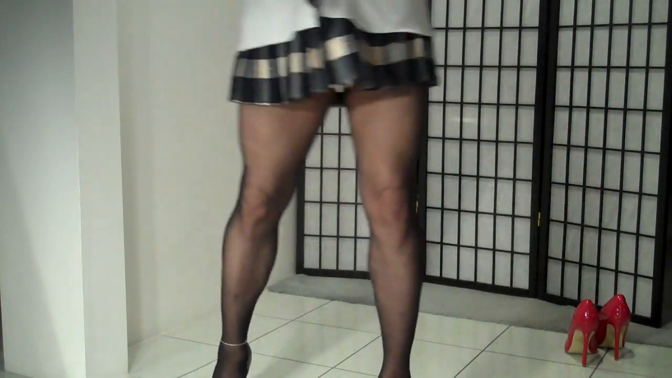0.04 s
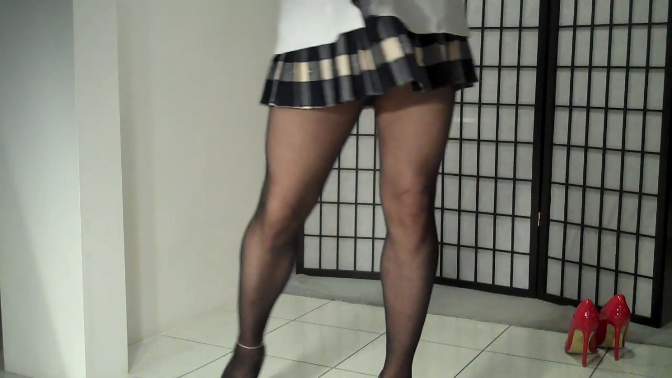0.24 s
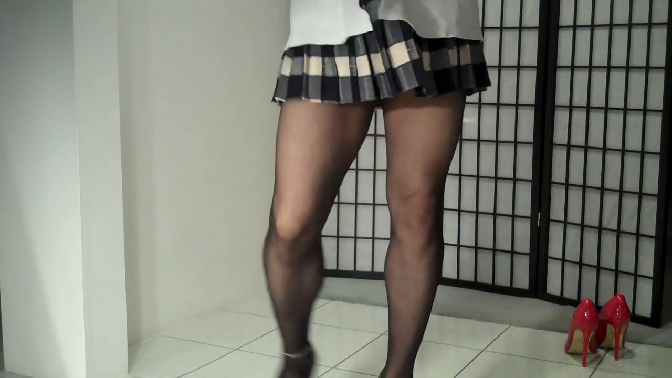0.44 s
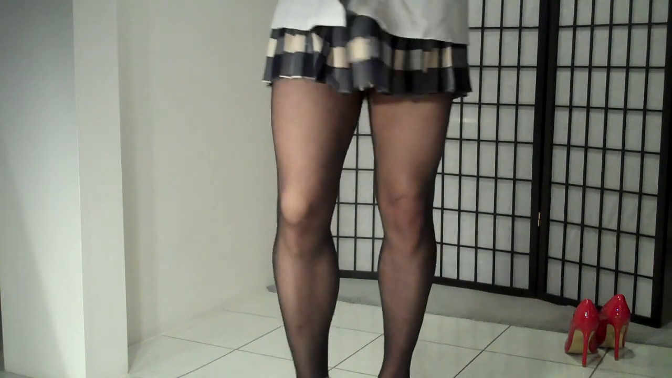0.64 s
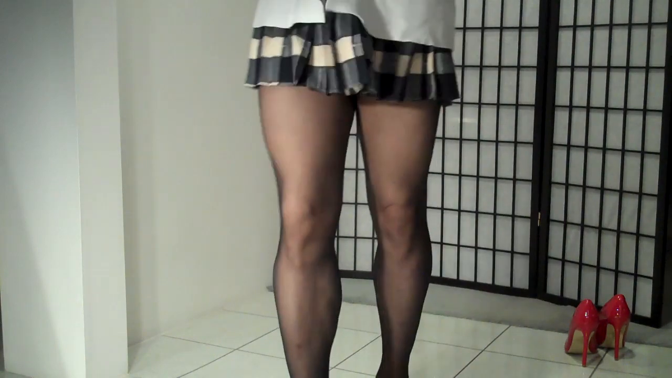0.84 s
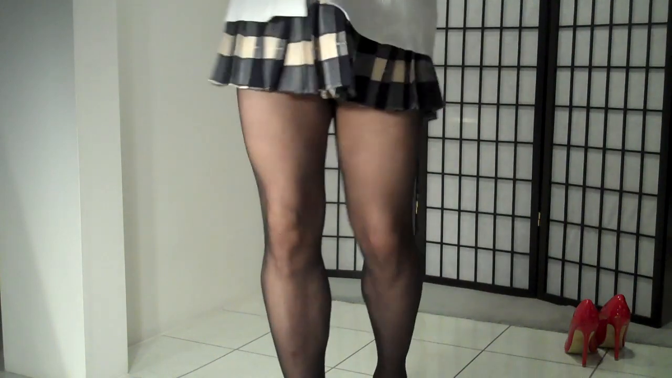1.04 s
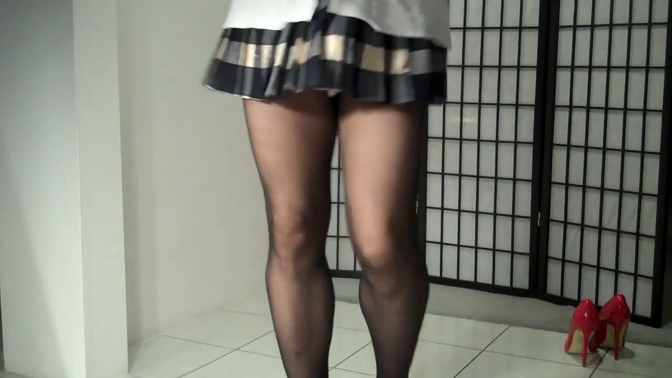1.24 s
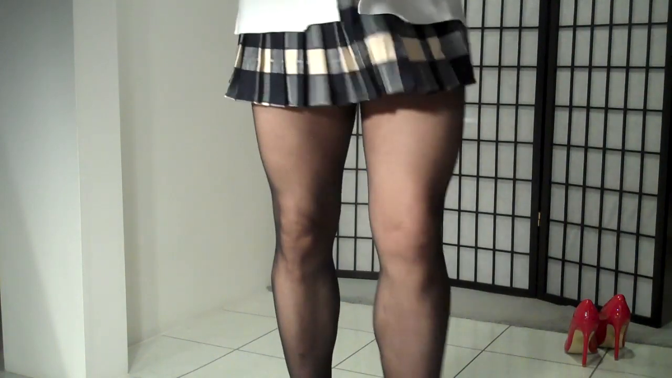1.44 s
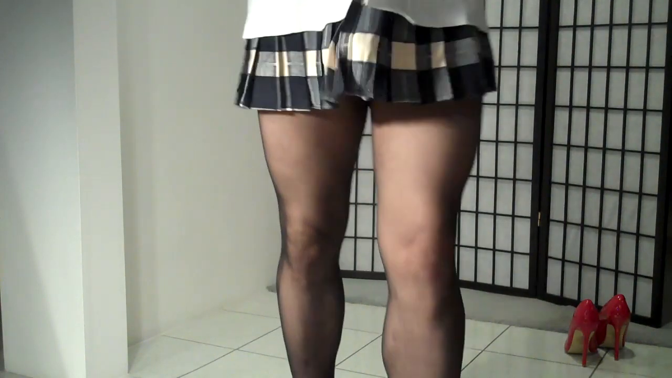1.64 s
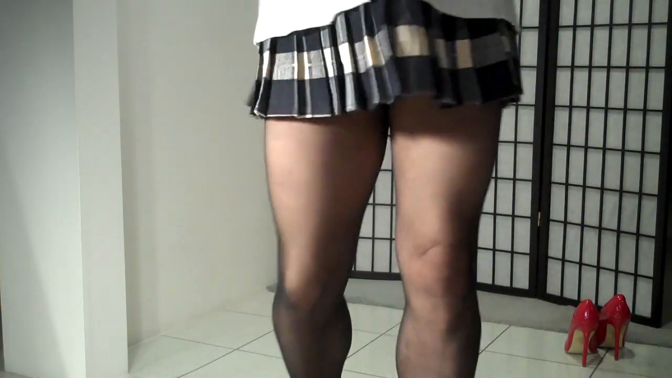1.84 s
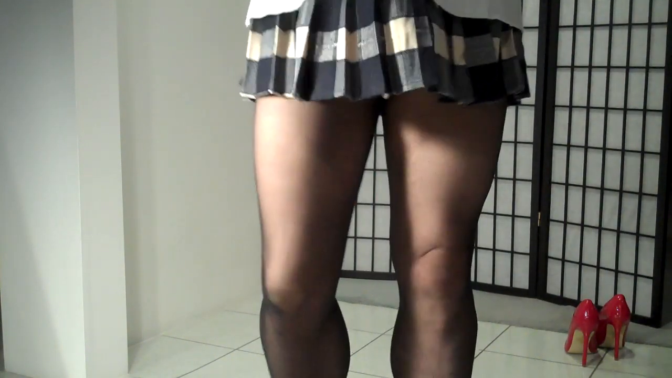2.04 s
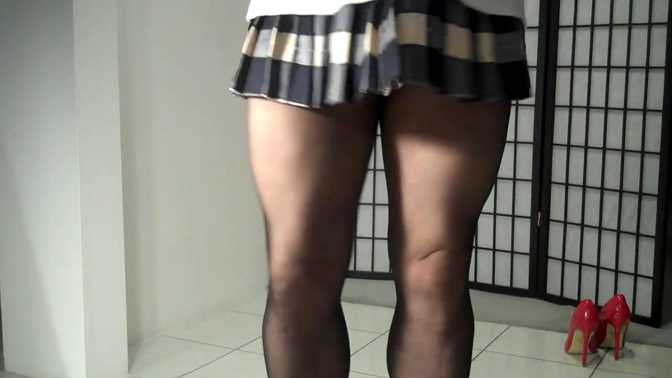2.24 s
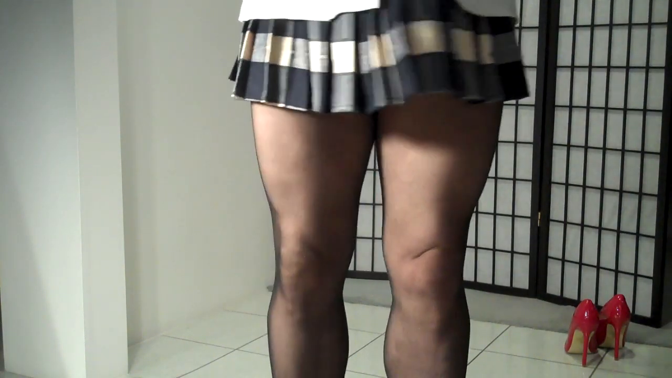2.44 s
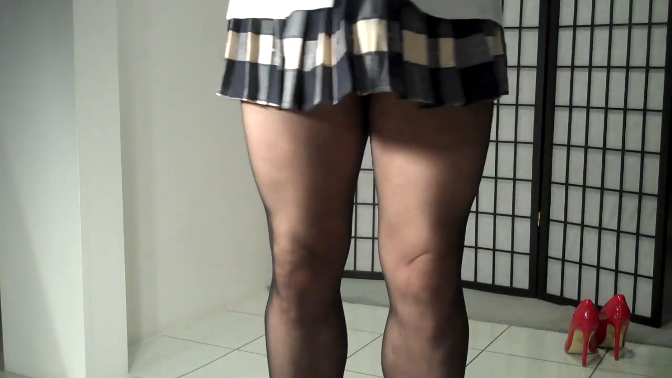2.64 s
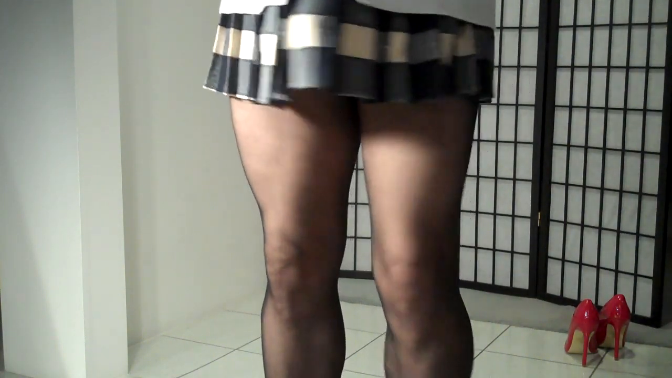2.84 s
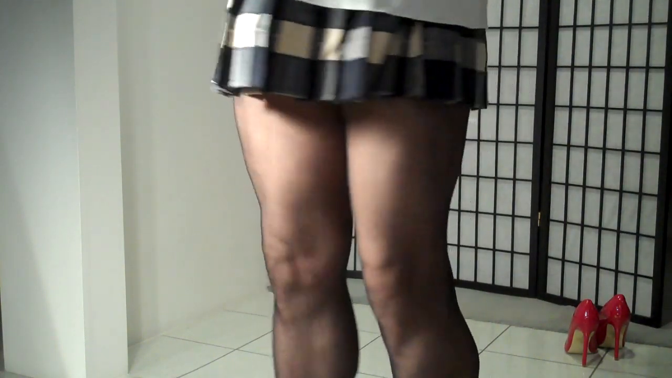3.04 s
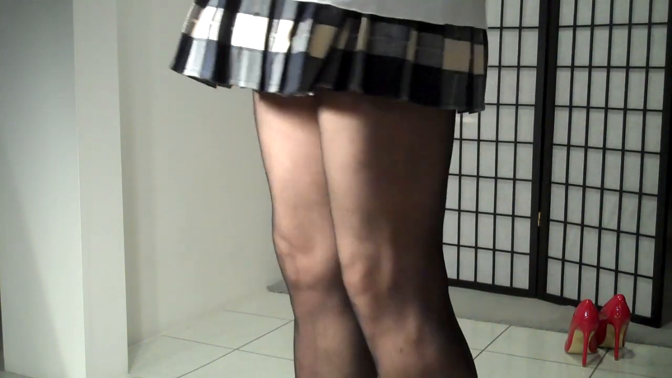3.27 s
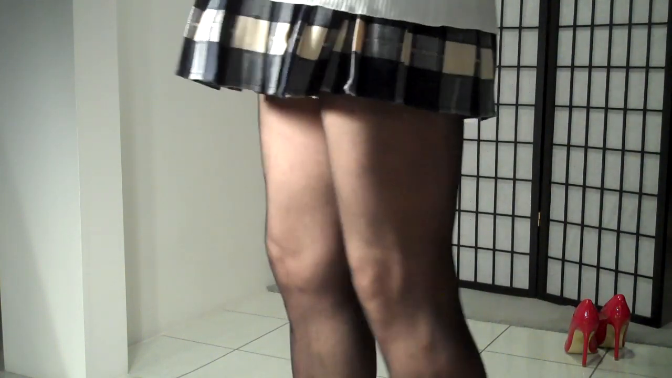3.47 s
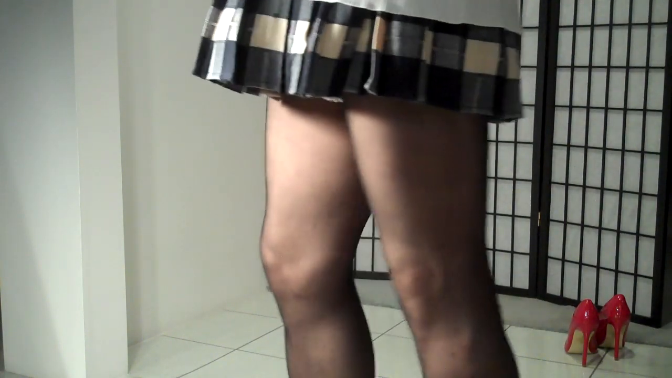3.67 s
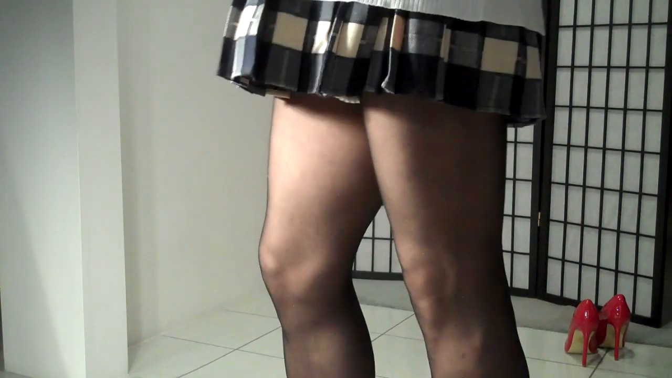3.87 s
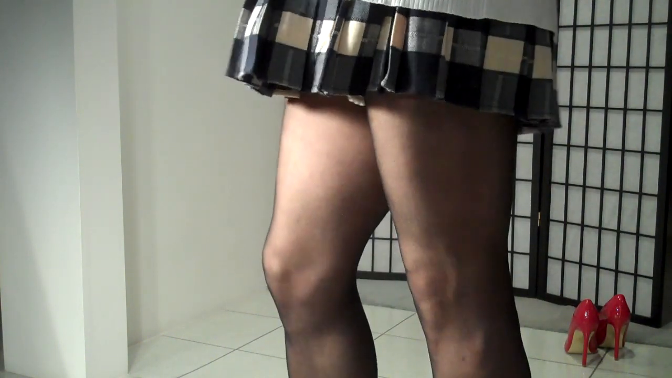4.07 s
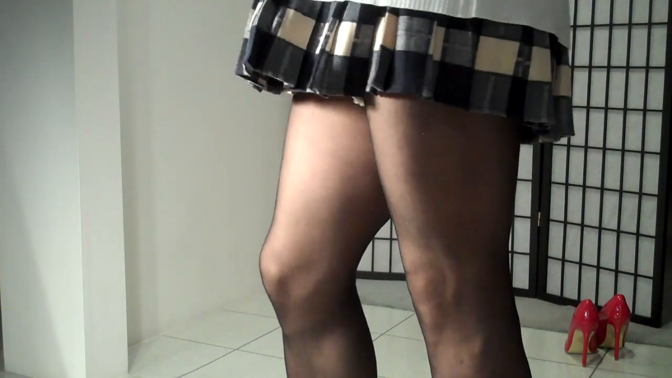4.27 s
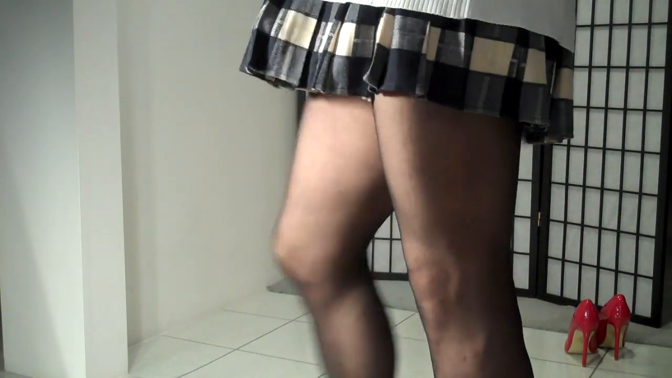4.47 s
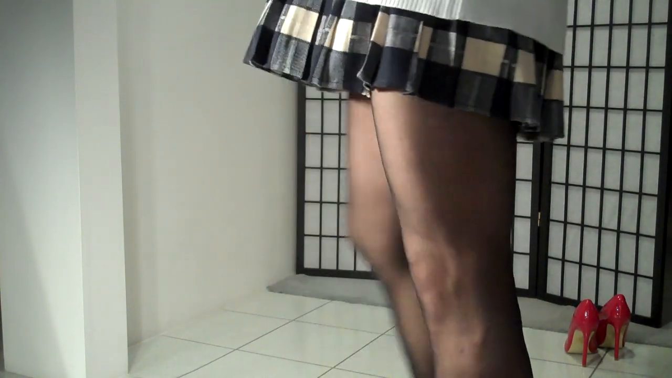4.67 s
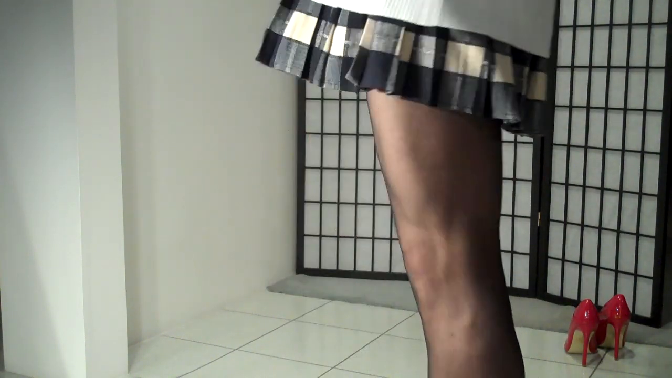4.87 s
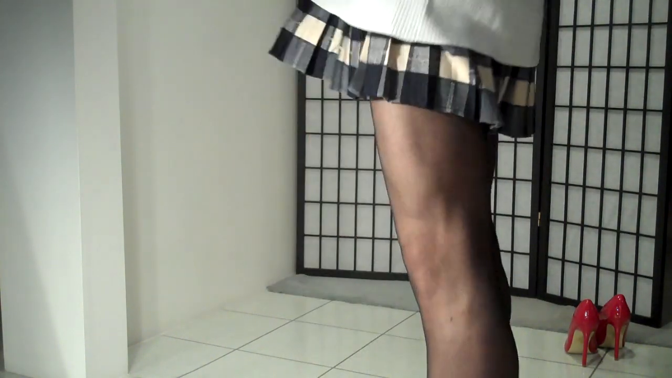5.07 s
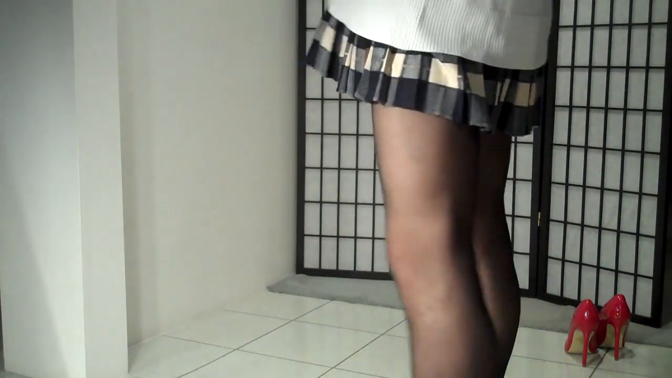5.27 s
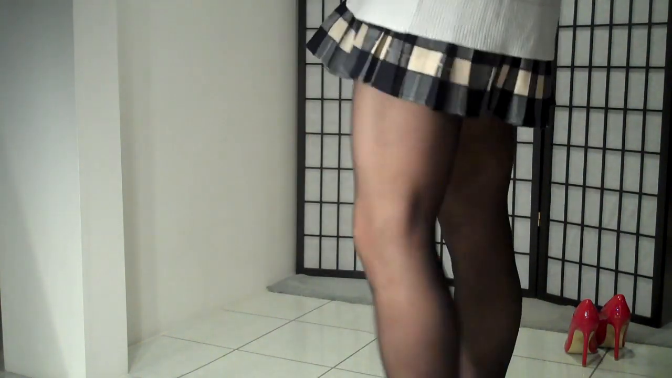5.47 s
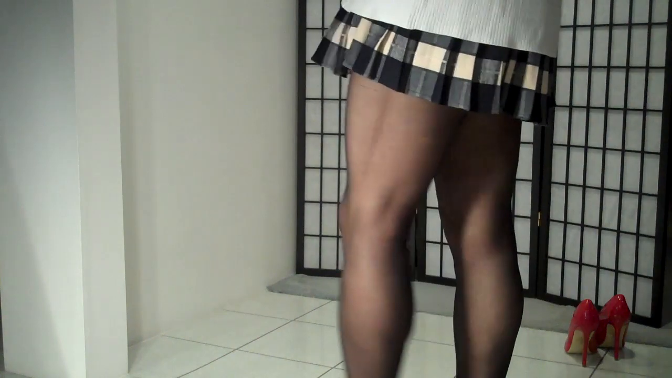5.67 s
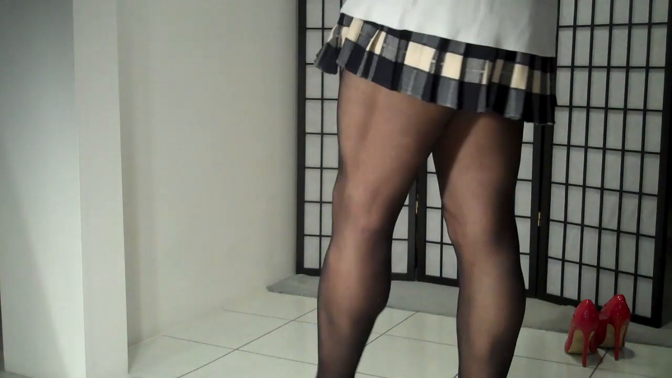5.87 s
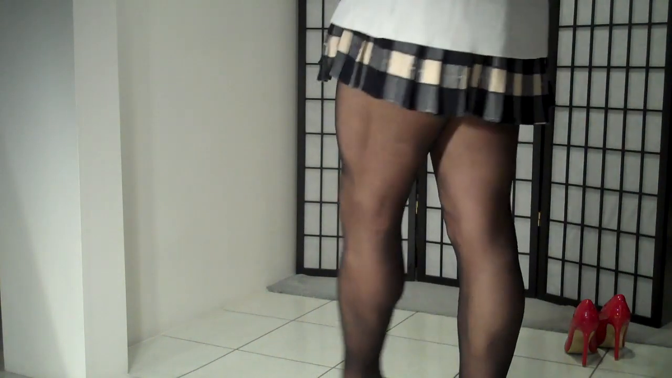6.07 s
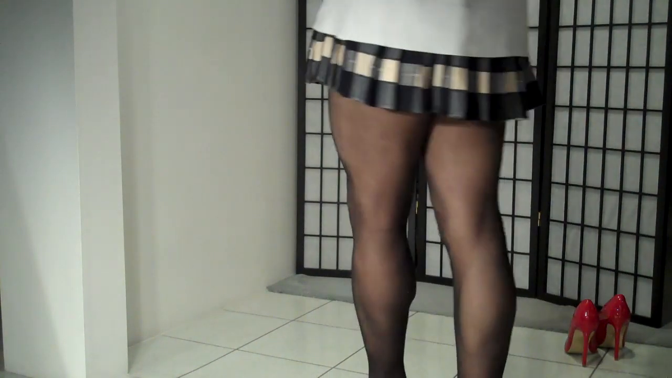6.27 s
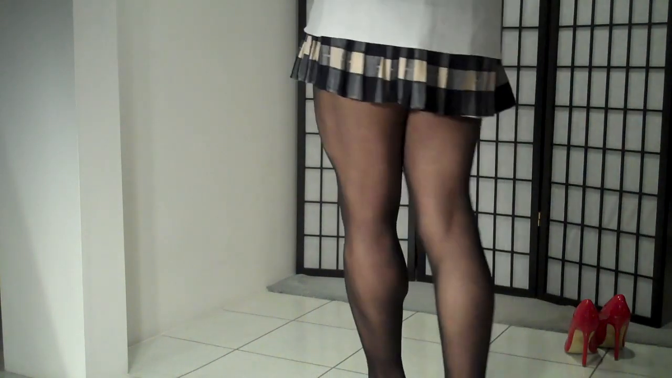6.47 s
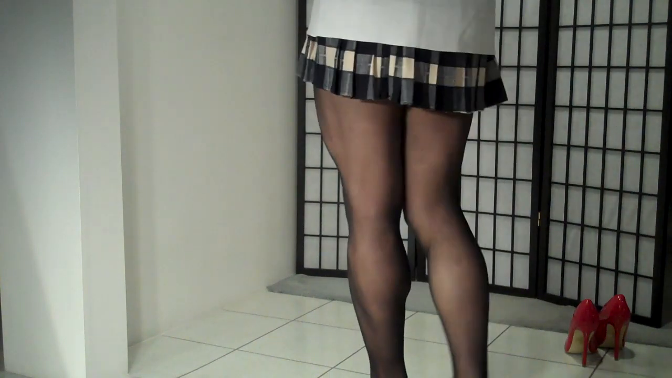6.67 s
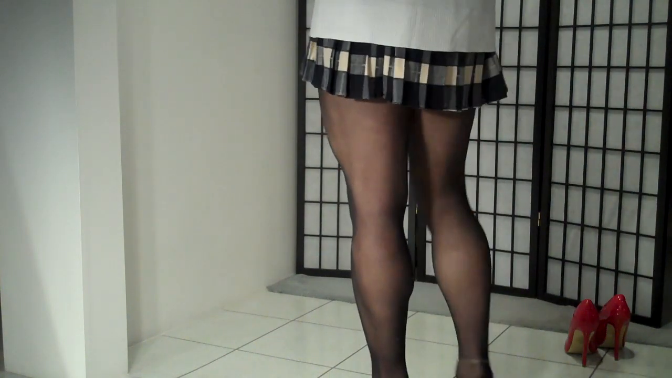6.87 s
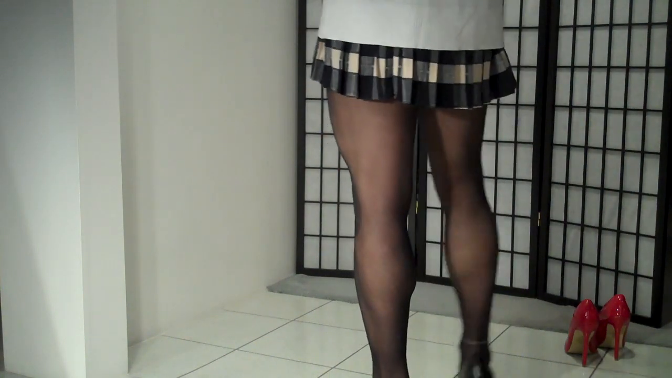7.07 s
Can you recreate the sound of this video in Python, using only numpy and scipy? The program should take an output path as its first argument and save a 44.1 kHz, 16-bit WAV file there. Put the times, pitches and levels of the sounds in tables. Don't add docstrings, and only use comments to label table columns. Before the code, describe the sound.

Steady, slightly bright microphone hiss and a very faint low drone fill a small, bare, reflective tiled room. Soft cloth rustles at 0.1 and 0.5 s. At 0.7 s a high-heeled shoe lands with a hollow knock, low thud and small tick; a sharp snap and scuff follow at 0.87 s, then crisp rubbing and a lighter contact at 1.0 s. Another step knocks at 1.5 s, another at 2.0 s, with very sharp snaps and a thin drag near 2.1 s. A hollow step at 2.3 s leads into fabric rubs until about 3.1 s. The strongest knock comes alone at 3.5 s. A small scuff ticks at 4.2 s, steps land at 4.6, 4.8 and 5.5 s, then a firm double knock at 6.0 s with bright snaps. A large fizzy rub swells at 6.5 s, and a softer last step falls at 7.1 s.

```python
import sys
import numpy as np
from scipy import signal
from scipy.fft import rfft, irfft, next_fast_len
from scipy.io import wavfile
from scipy.ndimage import uniform_filter1d

SR = 44100
rng = np.random.default_rng(int(sys.argv[2]) if len(sys.argv) > 2 else 0)


def to_wav(sig):
    pcm = np.clip(np.atleast_2d(sig), -1, 1) * 32767
    pcm = np.round(pcm).astype(np.int16)
    wavfile.write(sys.argv[1], SR, pcm.T)


def convert_level_to_amplitude(level_db):
    exponent = np.asarray(level_db, float) / 20
    return 10 ** exponent


N = 313551

# [f/Hz, level/dB per Hz]
HISS_COLOUR = [(18, -28), (30, -0.5), (169, -8), (260, -2), (560, -3), (1100, -6), (4000, -10.5),
               (14300, -15)]
# [f/Hz, likeness 0 to 1]
HISS_SAME = [(60, 0.13), (180, 0.43), (540, 0.16), (1640, 0.063), (4930, 0.093), (14800, 0.022)]
# [f/Hz, left minus right/dB]
HISS_LEAN = [(60, 0), (180, 0.5), (540, 6), (1640, 7), (4930, 3.5), (14800, -0.5)]
HISS_DB, TOP_HZ = -61.5, 14330
# [f/Hz, width/Hz, level/dB]
DRONE = [(228.3, 54, -72), (283, 19, -79.5), (116, 40, -88)]
# [f/Hz, width/Hz, level/dB, leak past the cavity/dB]
PORTS = [(7170, 870, 3.5, -10.5), (6160, 650, 1.5, -59)]
BASS_CUT_HZ = 102

# [f/Hz, time to fall 60 dB/s]
WALL_T60 = [(100, 0.39), (260, 0.37), (700, 0.36), (1840, 0.41), (4850, 0.25), (9000, 0.15)]
# [f/Hz, level/dB]
WALL_DB = [(100, 5), (300, 6), (700, 1.5), (1800, 3.5), (4000, -0.5), (8000, -3.5), (14000, -6.5)]
# [f/Hz, likeness 0 to 1]
WALL_SAME = [(300, 0.98), (700, 0.94), (1500, 0.78), (3000, 0.16), (6000, 0.031)]
# [t/s, echo level/dB]
DISTANCE = [
    (0, -8),
    (0.7, -2.5),
    (1.0, 2),
    (2.05, -2),
    (3.5, -1.5),
    (4.8, -2),
    (6.03, -0.9),
    (7.11, -1.5),
]
TIP_ECHO_DB = -0.5

# [f/Hz, level/dB]
FIZZ = [(800, -17), (2000, -6.5), (4000, 4.5), (7000, 1.5), (10000, -0.5), (14000, 2.5), (14500, -44)]
# [f/Hz, level/dB]
SWISH = [(200, -13), (600, 10), (1500, 11), (3000, 11), (5000, -8), (9000, -23)]
# [loudest moment t/s, level/dB, swell/s, fade/s,
# swish over fizz/dB]
RUBS = [(0.14, -64.5, 0.15, 0.37, 2), (0.507, -60, 0.16, 0.13, 1), (0.933, -49, 0.095, 0.08, -11),
        (1.118, -54.5, 0.059, 0.062, -13), (1.44, -65.5, 0.25, 0.1, 1), (1.696, -55, 0.24, 0.14, -5.5),
        (1.94, -65.5, 0.3, 0.18, 0.5), (2.35, -57, 0.062, 0.15, -15), (2.487, -52, 0.065, 0.066, -4.5),
        (2.666, -55, 0.1, 0.22, -0.5), (2.85, -55.5, 0.089, 0.52, -7), (2.95, -58, 0.15, 0.21, 0.5),
        (3.118, -62, 0.35, 0.043, 5), (4.19, -65, 0.61, 0.34, -8), (4.513, -66.5, 0.077, 0.061, 8.5),
        (4.99, -63, 0.49, 0.12, -4), (5.166, -61, 0.051, 0.08, -1), (5.63, -63, 0.36, 0.3, -7),
        (6.531, -40.5, 0.12, 0.11, -12.5),
        (0.868, -48, 0.026, 0.03, 2),
    (2.09, -51.5, 0.02, 0.18, -15),
    (2.18, -50.5, 0.18, 0.014, -19),
    (4.233, -52, 0.023, 0.047, -4),
    (5.45, -62.5, 0.27, 0.047, -3),
    (6.104, -56.5, 0.075, 0.12, 10.5),
]
# [loudest moment t/s, level/dB]
JOLTS = [
    (0.697, -58.5),
    (1.005, -67.5),
    (1.498, -62),
    (2.024, -57),
    (3.502, -58),
    (4.616, -58.5),
    (5.479, -57),
    (6.04, -57),
    (7.1, -59.5),
]
# [swell/s, fade/s, swish over fizz/dB]
JOLT_SHAPE = (0.034, 0.1, 3.5)
RUB_SPAN_DB = 12
STILL_DB, STILL_DULL_DB = -71.5, -6

# [t/s, peak level/dB, f/Hz, time to fall 60 dB/s]
THUDS = [(0.668, -48, 180, 0.057), (0.992, -62.5, 196, 0.069), (1.481, -54.5, 172, 0.029),
         (2.011, -46, 171, 0.016), (2.303, -54.5, 160.4, 0.04), (3.485, -42.5, 174, 0.018),
         (4.6, -41, 170, 0.011), (4.81, -48, 168, 0.019), (5.465, -41, 210, 0.077), (6.01, -48, 222, 0.048),
         (6.034, -37, 213, 0.048), (7.072, -42, 119, 0.012)]
# [t/s, peak level/dB, f/Hz]
HOLLOWS = [
    (0.991, -47.5, 575),
    (1.481, -57, 825),
    (2.302, -41, 586),
    (3.487, -38.5, 510),
    (4.601, -52, 347),
    (4.813, -51, 532),
    (5.465, -48, 566),
]
HOLLOW_T60_S = 0.041
# [t/s, peak level/dB, f/Hz, time to fall 60 dB/s]
CLACKS = [(0.6737, -49, 2270, 0.0061), (0.8449, -54, 3200, 0.0055), (0.8659, -44, 3500, 0.0044),
          (0.866, -49, 1900, 0.01), (0.9241, -51, 1743, 0.0024), (0.99, -54, 1740, 0.0077),
          (1.4813, -46, 2170, 0.012), (1.9248, -51.5, 3540, 0.0092), (2.0132, -41.5, 2050, 0.0057),
          (3.4856, -43, 2630, 0.0081), (4.6006, -46, 2020, 0.0072), (4.6955, -54, 2400, 0.0091),
          (4.8122, -41.5, 1720, 0.0027), (5.4652, -52, 3200, 0.0054), (6.0091, -58, 2200.0, 0.005),
          (6.0908, -41.5, 3030, 0.0033), (6.034, -35, 1880, 0.0021), (7.0707, -55.5, 2110, 0.0069)]
# [t/s, peak level/dB, dull part over snap/dB, left minus right/dB]
TICKS = [(0.6739, -34, -6.5, -2), (0.713, -42, -18, -7), (0.847, -39, -10, 8), (0.8652, -21, -21, -5),
         (0.9903, -40.5, -5, 23.5), (0.9948, -39.5, -5, -11), (1.4832, -31.5, 0.5, -1),
         (1.4937, -34.5, -4.5, -6), (1.9254, -40, 2, 3), (2.0136, -45, -4, 8), (2.0669, -25, -31, 1),
         (2.0773, -14.5, -25, 6), (2.0925, -25, -19, -4), (2.1904, -43.5, -14, 21), (2.595, -49, -7, 3),
         (2.601, -49, -10, 6), (2.66, -49, -23, 5), (2.859, -43, -1, 3), (3.4862, -33.5, -23, -6),
         (4.231, -47, 0, -7), (4.2348, -41.5, 3, 1), (4.239, -44, -5, -6), (4.6007, -35, 0, -4),
         (5.4635, -42.5, 3.5, -3), (6.0108, -37.5, -4, -5), (6.033, -30.5, -2, 2), (6.091, -17, -44, 1),
         (6.125, -27, -29, 2), (7.0714, -37, -3, 5)]
SNAP_LEAD = 64
# [t/s, peak level/dB, body f/Hz, arch f/Hz, arch over body/dB]
KNOCKS = [(0.6669, -35.5, 420, 980, -4), (0.6739, -45.5, 720, 1030, 3), (0.6838, -45, 603, 1180, -22),
          (0.8457, -56.5, 324, 990, 6.5), (0.924, -51, 523, 815, 7.5), (0.99, -47.5, 554, 970, -1),
          (1.48, -36, 333, 580, -7), (1.4826, -38, 814, 1350, -3), (1.9252, -50, 480, 1220, 3.5),
          (2.014, -39.5, 565, 1040, 2), (2.301, -39.5, 590, 1310, -4), (2.596, -57.5, 770, 1040, 7.5),
          (3.4857, -29.5, 608, 1280, -2), (4.6001, -46, 626, 1260, 6), (4.6959, -59, 700, 1230, 8.5),
          (4.7715, -50, 517, 1050, -9), (4.8127, -36, 564, 905, 2), (4.9403, -56.5, 580, 850, -3),
          (5.4643, -41, 514, 930, 5), (5.473, -42, 312, 1090, -4), (6.0103, -42, 530, 1440, -2.5),
          (6.0345, -31.5, 530, 1080, 2), (6.043, -32.5, 424, 1200, -12), (7.0705, -53, 540, 1090, 5)]
RING_T60_S, RING_LOSS_PER_DB = 0.014, 0.025


def evened(x):
    return x / np.sqrt(np.mean(x ** 2) + 1e-20)


def read(points, hz):
    f, value = np.transpose(points)
    return np.interp(np.log(hz + 1), np.log(f + 1), value)


def add(mix, s, sound):
    part = mix[..., round(s * SR):][..., :sound.shape[-1]]
    part += sound[..., :part.shape[-1]]


def coloured(x, points):
    size = next_fast_len(x.shape[-1])
    gain = convert_level_to_amplitude(read(points, np.fft.rfftfreq(size, 1 / SR)))
    return evened(irfft(rfft(x, size) * gain, size)[..., :x.shape[-1]])


def ring(hz, t60, rise):
    t = np.arange(SR // 8) / SR
    x = np.sin(2 * np.pi * hz * t) * convert_level_to_amplitude(-60 * t / t60) * (1 - np.exp(-t / rise))
    return x / abs(x).max()


def snap(hz, turns):
    t = np.arange(-SNAP_LEAD, 192) / SR
    return np.sin(2 * np.pi * hz * t) * np.exp(-(t * hz / turns) ** 2)


def hiss():
    frames, hz = N // 256 + 5, np.fft.rfftfreq(1024, 1 / SR)
    a, b, c, d, patches = rng.standard_normal((frames, 513, 5)).T
    patches = evened(uniform_filter1d(uniform_filter1d(patches, 12, 0), 14, 1))
    same = np.clip(read(HISS_SAME, hz), -1, 1)[:, None]
    left = a + 1j * b
    right = same * left + np.sqrt(1 - same ** 2) * (c + 1j * d)
    lean_db = np.array([.5, -.5])[:, None, None] * read(HISS_LEAN, hz)[:, None]
    z = np.array([left, right]) * convert_level_to_amplitude(read(HISS_COLOUR, hz)[:, None] + 1.57 * patches + lean_db)
    z[:, hz > TOP_HZ] = 0
    return convert_level_to_amplitude(HISS_DB) * evened(signal.istft(z, nperseg=1024, noverlap=768)[1][:, :N])


def drone():
    hz = np.fft.rfftfreq(N, 1 / SR)
    middle, side = rfft(rng.standard_normal((2, N)))
    pair = middle + 0.19 * side * np.array([[1], [-1]])
    hum = np.zeros((2, N))
    for f, width, db in DRONE:
        hum += convert_level_to_amplitude(db) * evened(irfft(pair / (1 + (2 * (hz - f) / width) ** 2), N))
    return hum


def walls():
    gaps = (SR * (.0004 + .0016 * np.exp(-np.arange(900) / 14.))).astype(int) + 2
    at = np.cumsum(gaps) - gaps[0] // 4 + (rng.random((2, len(gaps))) * gaps).astype(int)
    taps = np.zeros((2, at.max() + 1))
    np.put_along_axis(taps, at, rng.choice([-1., 1.], at.shape) * np.sqrt(gaps), 1)
    hz, t, (a, b) = signal.stft(taps, SR, nperseg=512, noverlap=384)
    same = np.clip(read(WALL_SAME, hz), 0, 1)[:, None]
    near = np.sqrt((1 + same) / 2) * a
    apart = np.sqrt((1 - same) / 2) * b
    t60 = read(WALL_T60, hz)[:, None]
    fall = convert_level_to_amplitude(read(WALL_DB, hz)[:, None] - 60 * t / t60)
    fall *= np.sqrt(2 * np.log(1000) / (t60 * SR))
    fall *= 1 + 0.5 * np.exp(-t / 0.023)
    return signal.istft(np.array([near + apart, near - apart]) * fall, SR, nperseg=512, noverlap=384)[1]


def motion():
    t = np.arange(0, N, 32) / SR
    moves = RUBS + [(*row, *JOLT_SHAPE) for row in JOLTS]
    s, db, swell, fade, dull_db = np.transpose(moves)[..., None]
    power = convert_level_to_amplitude(db - RUB_SPAN_DB * np.maximum((s - t) / swell, (t - s) / fade)) ** 2
    fizz = power.sum(0) + convert_level_to_amplitude(STILL_DB) ** 2
    swish = (power * convert_level_to_amplitude(dull_db) ** 2).sum(0) + convert_level_to_amplitude(STILL_DB + STILL_DULL_DB) ** 2
    return [np.interp(np.arange(N) / SR, t, np.sqrt(p)) for p in (fizz, swish)]


def rustle():
    fizz, swish = motion()
    slips = convert_level_to_amplitude(3.2 * np.minimum(rng.exponential(1, (3, N)), 6))
    slips *= rng.random((3, N)) < 5000 / SR
    slips *= rng.choice([-1., 1.], slips.shape)
    spread = slips[0] + 1.44 * slips[1:]
    flutter_db = 0.86 * evened(uniform_filter1d(rng.standard_normal(N), 900))
    return convert_level_to_amplitude(flutter_db - 13.0) * (fizz * coloured(spread, FIZZ) + swish * coloured(spread, SWISH))


def thud(db, hz, t60):
    return convert_level_to_amplitude(db) * ring(hz, t60, rise=0.0021)


def hollow(db, hz):
    return convert_level_to_amplitude(db) * ring(hz, HOLLOW_T60_S, rise=0.0024)


def clack(db, hz, t60):
    return -convert_level_to_amplitude(db + 9.0) * ring(hz, 0.5 * t60, rise=.0001)


def tick(db, dull_db, lean_db):
    no_lows = signal.butter(4, 3600, "high", fs=SR, output="sos")
    sound = signal.sosfilt(no_lows, snap(4470, turns=0.32))
    sound = sound + convert_level_to_amplitude(dull_db) * snap(3300, turns=.8)
    sound = sound + convert_level_to_amplitude(-23) * snap(13000, turns=2.4)
    return convert_level_to_amplitude(db - 4.0) * sound * convert_level_to_amplitude(np.array([[.5], [-.5]]) * lean_db)


def knock(db, body_hz, arch_hz, arch_db):
    t60 = RING_T60_S * np.exp(-RING_LOSS_PER_DB * arch_db)
    body = ring(body_hz, 0.85 * t60, rise=0.00038)
    arch = ring(arch_hz, 0.45 * t60, rise=0.00045)
    arch = arch - 0.29 * ring(1.55 * arch_hz, 0.11 * t60, rise=0.00022)
    return convert_level_to_amplitude(db + 2.5) * (body - convert_level_to_amplitude(arch_db) * arch)


def scene():
    spots, tips = np.zeros((2, 4, 2, N))
    for source, table in ((thud, THUDS), (hollow, HOLLOWS), (clack, CLACKS), (knock, KNOCKS)):
        for s, *row in table:
            add(spots[int(2 * s) % 4], s, source(*row)[None])
    for s, *row in TICKS:
        add(tips[int(2 * s) % 4], s - SNAP_LEAD / SR, tick(*row))
    spots[0] += rustle()
    far = convert_level_to_amplitude(np.interp(np.arange(N) / SR, *np.transpose(DISTANCE)))
    heard = drone()
    for spot, tip in zip(spots, tips):
        to_walls = far * (spot + convert_level_to_amplitude(TIP_ECHO_DB) * tip)
        heard += spot + tip + signal.fftconvolve(to_walls, walls(), axes=1)[:, :N]
    return heard


def port(x, hz, width, db, leak_db):
    r = np.exp(-np.pi * width / SR)
    poles = [1, -2 * r * np.cos(2 * np.pi * hz / SR), r ** 2]
    return convert_level_to_amplitude(db) * (signal.lfilter([0, sum(poles)], poles, x) - convert_level_to_amplitude(leak_db) * x)


def roll_off(x):
    return signal.sosfilt(signal.butter(12, 15430, fs=SR, output="sos"), x)


def record(dry):
    dry = signal.lfilter(*signal.butter(3, BASS_CUT_HZ, "high", fs=SR), dry)
    ports = np.array([port(x, *row) for x, row in zip(dry, PORTS)])
    return roll_off(ports + hiss())


dry = scene()
out = record(dry)
to_wav(out)
```